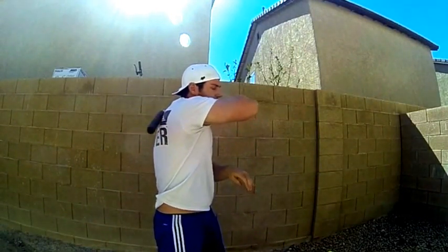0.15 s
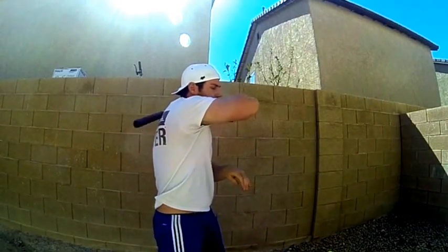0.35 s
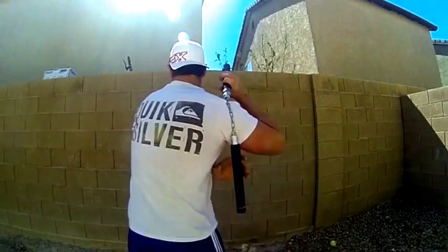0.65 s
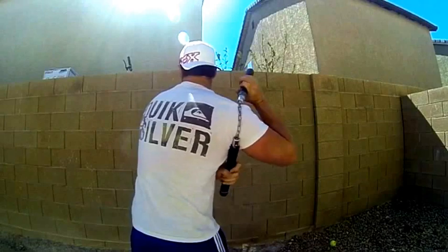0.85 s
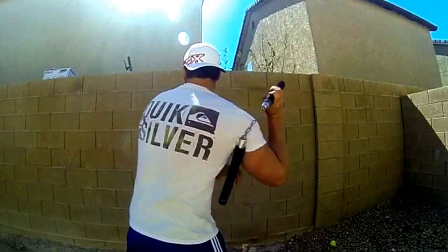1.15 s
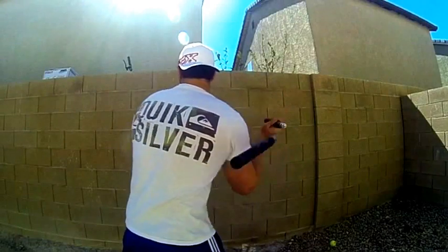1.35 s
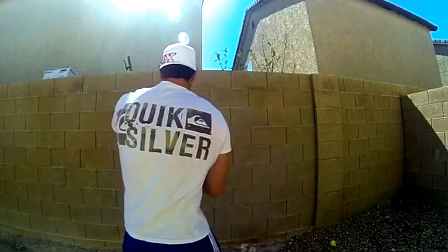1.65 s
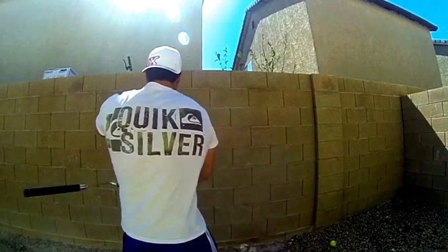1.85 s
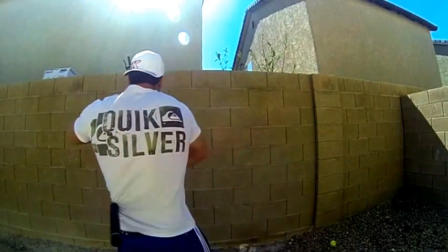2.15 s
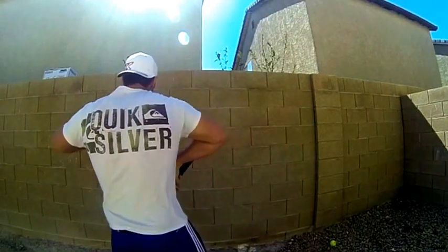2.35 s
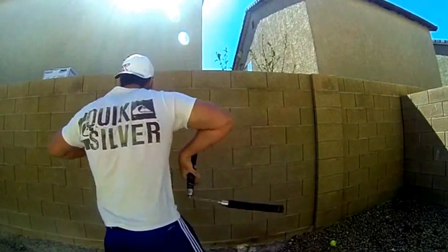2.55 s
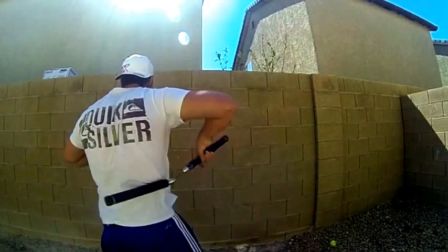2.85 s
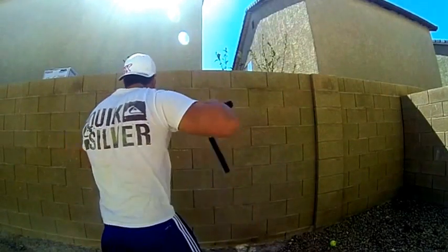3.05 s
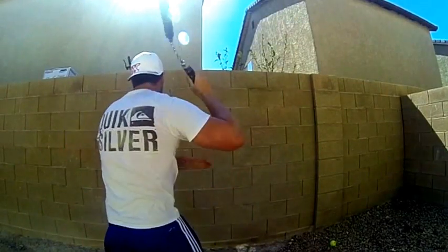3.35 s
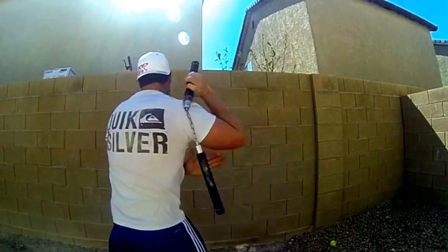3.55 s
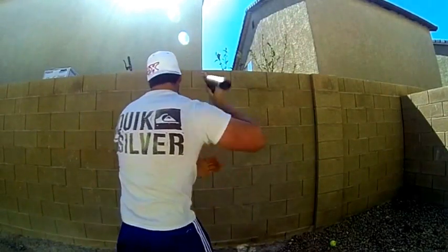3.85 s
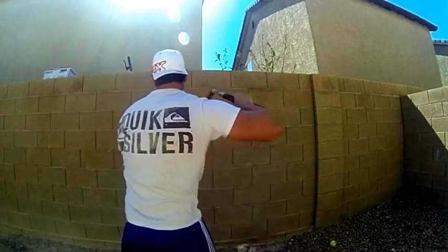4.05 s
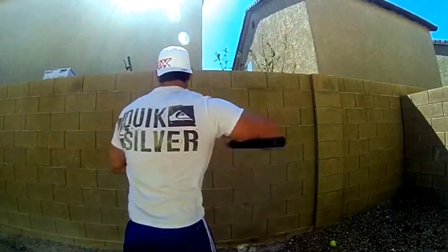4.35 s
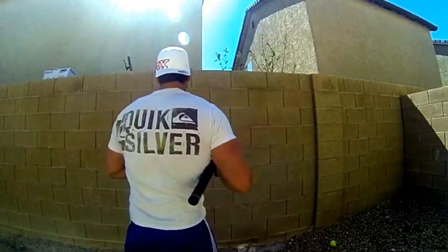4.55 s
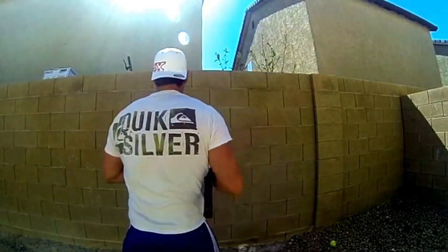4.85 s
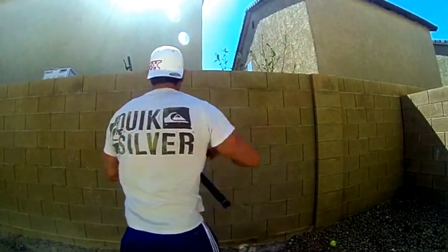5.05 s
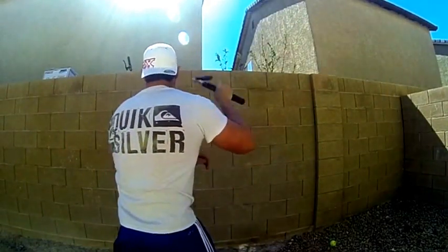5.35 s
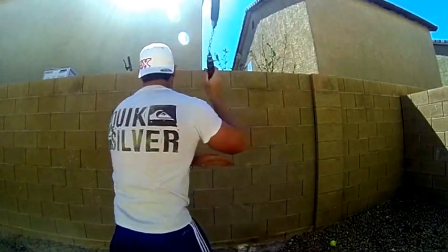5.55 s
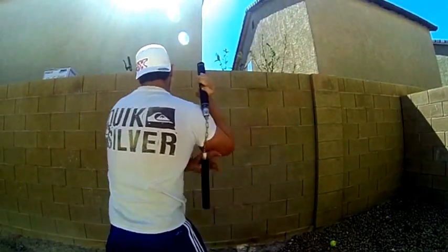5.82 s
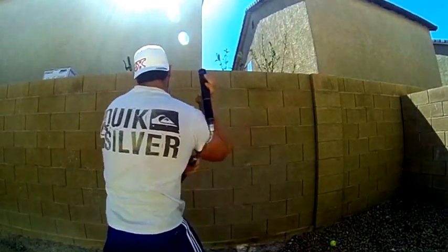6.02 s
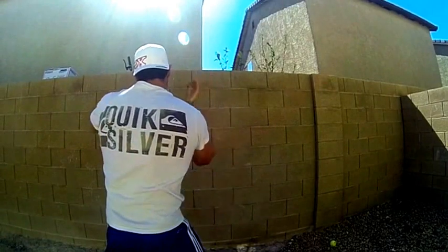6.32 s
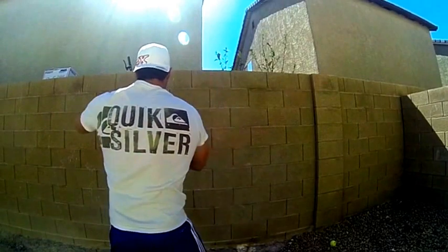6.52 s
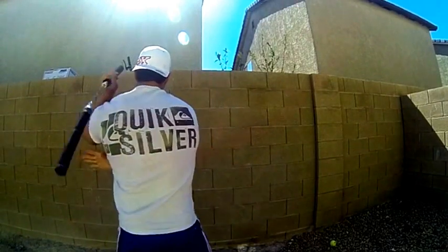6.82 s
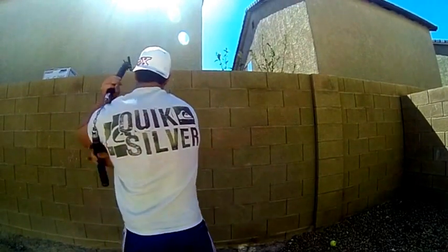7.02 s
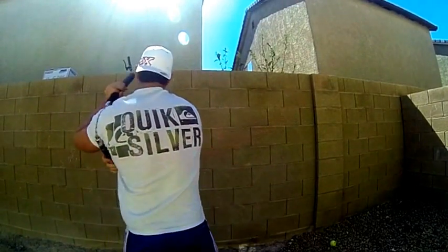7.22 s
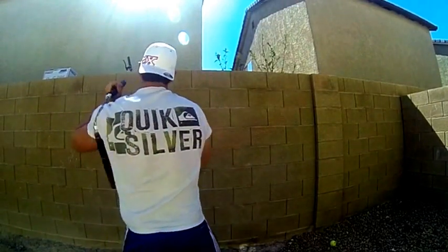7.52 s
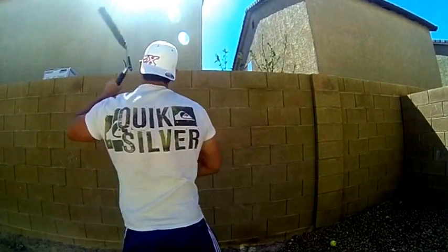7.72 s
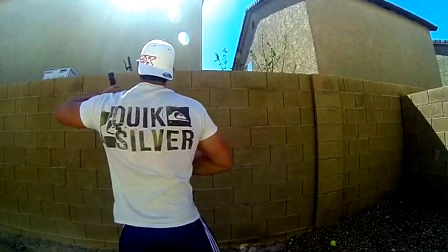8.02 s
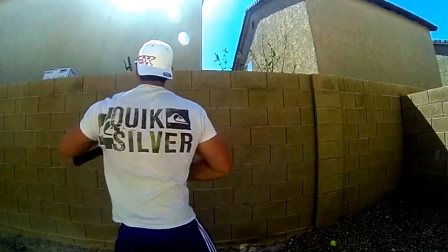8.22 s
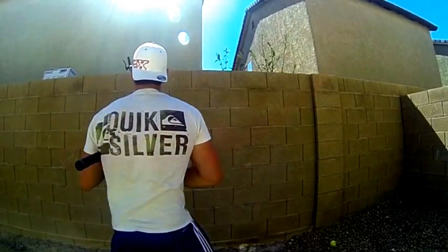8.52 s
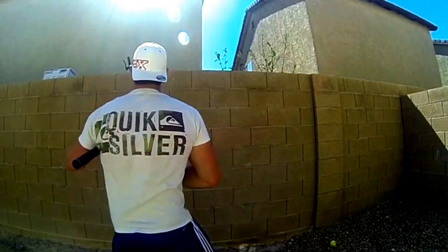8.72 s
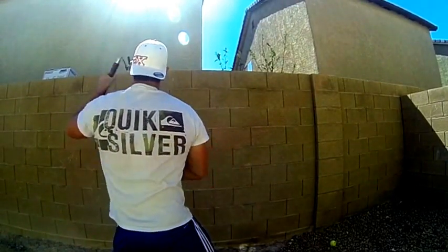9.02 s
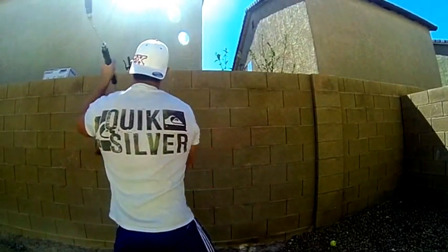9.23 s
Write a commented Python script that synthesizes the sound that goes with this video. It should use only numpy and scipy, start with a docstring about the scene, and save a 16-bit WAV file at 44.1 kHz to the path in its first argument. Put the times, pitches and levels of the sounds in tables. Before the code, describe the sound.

From 0 to 0.7 s the sound is slowed five times: dull, stretched low wind with lowered electronic hiss, whine and ticks. It fades out and normal speed fades in. Deep wind buffeting and mount rumble continue throughout, over thin hiss, a faint high pulsing whine and buzz. Stick knocks come at 0.8, 1.15 and 1.4 s, then a strong hollow blow at 1.86. Small chain clinks and clacks gather around 2.65-2.8. Contacts at 3.2-3.8 mix with soft case whistles; the loudest thud lands at 4.0. From 4.35 to 5.3 there is a busy run of light clacks and scuffs, with wind thumps and whistling gusts. Sparser taps follow at 5.84, 6.25 and 6.6, a scrape and chain rattle at 6.9, airy puffs near 7.9, firm knocks at 8.35 and 8.67, and a light one at 9.2. Short wall slaps and dull yard echoes follow the blows.

```python
"""A slowed opening, five times slower, holds wind over a plastic-cased camera and its hiss, whine, buzz and tick.
It fades out and real time fades in: eddies push the microphone membrane, shake the mount and feed the case modes.
Chain-linked sticks then strike and scrape, ringing the modes; a near wall and a walled yard answer.
Loose links touch and the slack chain rattles between blows; later, short gusts make the case whistle."""
import sys
import numpy as np
from scipy import signal
from scipy.fft import rfft, irfft
from scipy.io import wavfile
from scipy.ndimage import uniform_filter1d

SR = 44100
rng = np.random.default_rng(int(sys.argv[2]) if len(sys.argv) > 2 else 0)


def wav_out(sig):
    """Save sig, one row per channel (or a flat mono array), as 16-bit PCM at SR to the path in sys.argv[1]."""
    wavfile.write(sys.argv[1], SR, np.round(np.clip(np.atleast_2d(sig).T, -1, 1) * 32767).astype(np.int16))


N = 413658


def undb(db):
    """Amplitude factor of a level in dB."""
    return 10 ** (np.asarray(db) / 20)


def level(x, db):
    """Scale x to an rms level in dB."""
    return x * undb(db) / np.sqrt(np.mean(x ** 2))


def band(lo_hz, hi_hz, order=2):
    """Band-limited noise, rms 1, past the filter's onset."""
    sos = signal.butter(order, [lo_hz, hi_hz], "bandpass", fs=SR, output="sos")
    return level(signal.sosfilt(sos, rng.standard_normal(N + SR))[SR:], 0)


def ring(x, modes):
    """Sum of decaying two-pole resonances driven by x."""
    out = np.zeros(x.shape)
    for hz, db, t60_s in modes:
        r = np.exp(-np.log(1000) / (t60_s * SR))
        w = 2 * np.pi * hz / SR
        out += undb(db) * signal.lfilter([np.sin(w)], [1, -2 * r * np.cos(w), r * r], x)
    return out


def walk(rate_hz):
    """Random values drawn at rate_hz and smoothed; spread somewhat below 1."""
    k = int(SR / rate_hz)
    held = np.repeat(rng.standard_normal(N // k + 1), k)
    return uniform_filter1d(uniform_filter1d(held, k), k)[:N]


def swells(rows):
    """Sum of raised-cosine gain bumps, one per (middle [s], width at half gain [s], level [dB])."""
    t = np.arange(N) / SR
    gain = 0
    for middle_s, width_s, db in rows:
        phase = np.pi * np.clip((t - middle_s) / (2 * width_s), -.5, .5)
        gain = gain + undb(db) * np.cos(phase) ** 2
    return gain


# wind: (time [s], slow buffeting [dB], quick buffeting [dB], mount shake [dB], case hum [dB])
WIND_LEVELS = [(0.8, -36, -49.5, -66, -59.5), (1.11, -36.5, -53, -45.5, -65.5),
               (1.54, -32, -27, -57, -59.5), (1.71, -23, -51, -42, -55), (1.85, -29, -35.5, -47, -57),
               (2.9, -30.5, -42, -51, -55.5), (3.15, -32.5, -40, -48, -58.5),
               (3.57, -30.5, -31.5, -49, -55.5), (3.98, -32, -45.5, -48.5, -62),
               (4.03, -30, -36.5, -47.5, -61), (4.17, -20.5, -37, -52.5, -55.5),
               (4.55, -31.5, -48, -51, -54), (4.75, -37.5, -24, -41.5, -65), (4.93, -33, -20, -45, -49),
               (5.08, -35.5, -32.5, -47.5, -53.5), (5.2, -31.5, -50, -46.5, -58),
               (5.91, -31, -46, -55.5, -64.5), (5.99, -23, -44, -37.5, -54),
               (6.17, -33.5, -36.5, -51.5, -56), (6.61, -31, -49, -47.5, -57.5),
               (7.23, -32.5, -32.5, -49, -62.5), (7.8, -41, -58, -59.5, -65),
               (8.23, -30, -38.5, -52.5, -61), (8.92, -30, -48.5, -49, -65.5),
               (9.38, -36, -41.5, -56, -66.5)]
# wind in the slowed opening: (slow buffeting [dB], quick buffeting [dB], mount shake [dB], case hum [dB])
OPENING_WIND = (-34.5, -37, -57, -73)


def wind_gains():
    """Wind strength over time as four interpolated gains, one per mechanism."""
    t = np.arange(N) / SR
    s, *columns = np.transpose([(0.42, *OPENING_WIND)] + list(WIND_LEVELS))
    return [undb(np.interp(t, s, column)) for column in columns]


def buffeting(slow, quick):
    """Eddies push the microphone membrane: two bands of very low noise."""
    return slow * band(8.64, 21.1, order=3) + quick * band(22.85, 34.9, order=4)


# shaking mount: (frequency [Hz], width [Hz], relative level [dB])
MOUNT_BANDS = [(53.86, 13, 0), (68, 21, -5.5)]


def mount_shake(shake):
    """Wind shakes the mount unsteadily: narrow noise bands, flickering together."""
    unsteady = shake * undb(3.5 * walk(5))
    return unsteady * sum(undb(db) * band(hz - w / 2, hz + w / 2) for hz, w, db in MOUNT_BANDS)


# case modes, also rung by rush, contacts and rattle: (frequency [Hz], gain [dB], t60 [s])
CASE_MODES = [(126.9, -18.5, 0.34), (149.4, -15, 0.34), (250, -11, 0.14), (334, -16, 0.2), (372, -19, 0.34),
              (697.2, 3, 0.071), (778, -2, 0.075), (809.7, -9.5, 0.17), (940, -8, 0.05), (1016, -13, 0.26),
              (1055, -3.5, 0.07), (1140, -5, 0.035), (1520, 2, 0.03), (1673, 7.5, 0.031), (1810, -5, 0.048),
              (2000, -7, 0.03), (2280, 3, 0.015), (2580, 5, 0.018), (2900, 4, 0.042), (3400, -4, 0.014),
              (3800, -1, 0.02), (4200, -8, 0.012), (4600, -12, 0.01)]
# swells of the low modes: (middle [s], width [s], level at 250 Hz before trim [dB], tilt [dB/octave])
HUM_BUMPS = [(1.9, 0.089, -51, 5), (3.043, 0.079, -56, 8.5), (3.275, .05, -48.5, -0.5),
             (4.591, 0.036, -49, -5), (4.725, 0.088, -49, -1), (4.949, 0.087, -44, -3),
             (5.152, 0.057, -44.5, -3), (5.05, 0.1, -54, -6), (6.046, 0.035, -54, -11),
             (6.286, 0.095, -50.5, -0.5), (6.94, 0.17, -55.5, 9), (7.655, 0.067, -52, 0.5),
             (8.009, 0.052, -49.5, -6)]


def case_hum(hum):
    """Each low case mode is fed by its own eddies, over a broad rumble."""
    flicker_db = 3
    low_modes = CASE_MODES[:5]
    eddies = [ring(rng.standard_normal(N) * undb(flicker_db * walk(6)), [m]) for m in low_modes]
    tones = 0
    for (hz, _, _), eddy in zip(low_modes, eddies):
        bumps = swells([(s, w, db + tilt * np.log2(hz / 250)) for s, w, db, tilt in HUM_BUMPS])
        tones = tones + (hum + bumps) * eddy
    tones = tones * undb(-4.5) / np.std(sum(eddies))
    rumble = hum * undb(-7.0 + flicker_db * walk(10)) * band(77, 390, order=3)
    return tones + rumble


# puffs over the case, first three heard slowed: (middle [s], width [s], level [dB])
AIR_PUFFS = [(0.115, .02, -65), (0.155, .03, -66), (0.215, .015, -68), (1.11, 0.12, -69.5),
             (1.71, 0.34, -71.5), (2.5, 0.2, -76.5), (3.21, 0.036, -72), (3.45, 1, -67.5),
             (4.11, 0.08, -60.5), (4.91, 0.11, -73), (5.24, 0.088, -65), (6.545, 0.02, -61),
             (6.94, 0.12, -58.5), (8.74, .07, -62.5), (4.7, 0.16, -76), (5.0, 0.16, -75.5),
             (3.3, 0.086, -61), (3.42, 0.036, -69), (7.65, 0.05, -61), (7.81, 0.09, -62),
             (7.905, .02, -54.5), (7.95, 0.07, -64)]


def air_rush():
    """Steady air and puffs rush over the case and ring its next seven modes with noise."""
    gain = undb(-69.5 + 0.5 * walk(11)) + swells(AIR_PUFFS)
    air = band(620, 877, order=1) * undb(3.4 * walk(16))
    return gain * level(ring(air, CASE_MODES[5:12]), -0.038)


# hiss spectrum shape: (frequency [Hz], relative density [dB])
HISS_SHAPE = [(80, -6), (190, -19), (300, -24.5), (510, -28), (900, -30), (1150, -32.5), (1470, -27),
              (1900, -35.5), (3000, -40.5), (4400, -44.5), (5600, -40), (6200, -47), (6700, -59.5),
              (7200, -50.5)]


def hiss():
    """Electronic noise coloured in the spectrum."""
    f = np.fft.rfftfreq(N, 1 / SR) + 1  # +1 keeps the log finite
    hz, db = np.transpose(HISS_SHAPE)
    colour = undb(np.interp(np.log(f), np.log(hz), db)) * (f > 50)
    return level(irfft(rfft(rng.standard_normal(N)) * colour, N), -56.5)


FRAME_HZ = 120


def whine():
    """A tone and noise gated on for part of every frame, each burst at its own phase and pitch."""
    t = np.arange(N) / SR
    frame = t * FRAME_HZ
    is_on = (frame % 1 > .39) & (frame % 1 < .95)
    gate = is_on * undb(-1.8 * (frame % 2 > 1))  # alternate frames are weaker
    gate = uniform_filter1d(gate, 40)
    phase, detune = rng.standard_normal((int(frame[-1]) + 1, 2))[frame.astype(int)].T
    tone = np.sin(2 * np.pi * ((5670 + 70 * detune) * t + phase))
    return gate * (undb(-69.5) * tone + undb(-83.5) * band(5000, 5240, order=1))


# buzz harmonics: (multiple of the frame rate)
BUZZ_HARMONICS = (11, 12, 21, 22, 23, 26, 27, 28, 39)
# buzz harmonics, same order: (level [dB rms])
BUZZ_LEVELS_DB = (-79.5, -78.5, -90, -95.5, -91, -99, -96.5, -100.5, -99)


def buzz():
    """Thin electronic buzz: steady harmonics of the frame rate."""
    frame = np.arange(N) / SR * FRAME_HZ
    harmonics = zip(BUZZ_HARMONICS, BUZZ_LEVELS_DB)
    return sum(np.sqrt(2) * undb(db) * np.sin(2 * np.pi * k * frame + k * k) for k, db in harmonics)


def tick():
    """Faint regular electronic tick: a high tone under short Gaussian envelopes."""
    rate_hz, width_s = 8.004, .003
    t = np.arange(N) / SR
    offset_s = ((t * rate_hz + .5) % 1 - .5) / rate_hz
    return undb(-74) * np.exp(-(offset_s / width_s) ** 2) * np.sin(2 * np.pi * 6150 * t)


# contacts on palms, body and links:
# (time [s], level [dB], knock share [dB], clack share [dB], click above clack [dB], drag [ms])
CONTACTS = [(0.772, -43.5, -20, -18.5, -9, 4.9), (0.8, -39, -11, -21.5, -12, 3.7),
            (1.149, -40.5, -6, -27, -8, 5.44), (1.4, -47.5, -6, -15, -3.5, 4.9),
            (1.857, -24, -5.5, -19.5, -10, 4.1), (1.925, -33, -15, -38, -6, 4.2),
            (2.655, -45, -8, -22, -1, 9.6), (2.726, -60, -15, -7.5, 3, 1.5), (2.734, -63, -23, -9.5, 7, 2),
            (2.757, -58, -17, -6, 0, 3), (2.774, -38, -17, -11.5, -9.5, 3.1),
            (3.23, -39, -8, -27, -15, 2.6), (3.386, -42.5, -21, -22, -15, 10.1),
            (3.5975, -47.5, -11, -7, -5, 2.9), (3.603, -38.5, -15, -10.5, -17, 7.1),
            (3.629, -43.5, -11, -19, -7, 4.8), (3.724, -46, -22, -23, -8, 3.7),
            (3.779, -50, -21, -9, -17, 4.2), (3.998, -19, -7.5, -26, -7.5, 4.63),
            (4.355, -39, -14.5, -6.5, -14.5, 3.9), (4.442, -48.5, -13, -11.5, -17, 5.6),
            (4.47, -49, -12.5, -15, -11, 4.8), (4.626, -51.5, -6.5, -9, -14, 2.8),
            (4.692, -45, -9, -7.5, -29, 2.5), (4.743, -51.5, -12, -9, -18.5, 4),
            (4.782, -58, -3, -7.5, -18, 4.1), (4.834, -45.5, -9, -25, -1.5, 5.3),
            (4.855, -41.5, -17, -20, -13, 6.14), (4.914, -43, -13, -20.5, -15, 6.4),
            (4.929, -48, -0.5, -23, -14, 4.5), (4.975, -51, -14, -29, -7, 5.7),
            (5.059, -47, -10.5, -19, -14, 4.1), (5.119, -49, 1, -21, -3, 4.3),
            (5.271, -47, -18, -26, 0, 4.4), (5.841, -46.5, -19, -14, -8.5, 3.5),
            (6.242, -52, -1.5, -17, -10, 16), (6.278, -43, -6, -28, -1, 9.7),
            (6.618, -37.5, -32, -32, 0, 0.9), (6.901, -43, -18, -25, -10, 16),
            (6.942, -43, -14, -11, -6, 2.34), (7.283, -52, 1.5, -17, -14, 6.4),
            (7.481, -65.5, -9, -7, 6, 3.8), (8.219, -46, -13, -6, -14.5, 3.2),
            (8.245, -57, -12, -7, -12, 3.8), (8.2815, -45, -11, -12, -19, 6.3),
            (8.35, -31.5, -6, -28, -13, 4.5), (8.67, -32.5, -8, -27, -19, 4.6),
            (9.198, -49, -5.5, -26, -13, 5.2)]
# thud, knock, clack, click bands: (low [Hz], high [Hz])
CONTACT_BANDS_HZ = [(640, 900), (880, 1250), (1400, 2150), (2150, 4600)]
# dry part beside the ringing modes: (thud, knock, clack, click [relative gain])
DRY_PARTS = (.2, .3, 1.6, 2.6)
# how late each band speaks: (thud, knock, clack, click [ms])
BAND_LAGS_MS = (1.3, 0.3, 2.2, 2.4)


def contacts():
    """Blow plus scrape per contact: soft ones drive lower modes, hard ones higher; returns sound and blows."""
    s, contact_db, knock_db, clack_db, click_db, drag_ms = np.transpose(CONTACTS)
    base_thud_db, hard_from_db, thud_loss = -6, -17.5, 0.57
    thud_db = base_thud_db - thud_loss * np.maximum(clack_db - hard_from_db, 0)
    share_db = thud_db, knock_db, clack_db, clack_db + click_db

    t = np.arange(int(.15 * SR)) / SR
    sharp = np.exp(-(drag_ms / 4.45) ** 4)[:, None]  # 1 for a tap, 0 for a scuff
    age = t / (drag_ms[:, None] * .001)
    swell_in = sharp + (1 - sharp) * 2 * age ** 2
    push = rng.standard_normal((len(s), len(t))) * swell_in * np.exp(-age * (2 - sharp))
    # first sample is the blow; hard contacts are mostly scrape
    push[:, 0] = 8.9 * sharp[:, 0] * undb(thud_db - base_thud_db)

    # each contact strikes the modes a little differently
    spot_db = 2.5 * rng.standard_normal((len(s), len(CASE_MODES)))
    # the long ring wakes most under heavy blows
    spot_db[:, 9] += np.clip(.5 * (contact_db - contact_db.max()), -12, 0)
    # wood rings this mode, links barely do
    spot_db[:, 18] -= np.clip(2 * (clack_db + 18), 0, 14)

    sound = 0
    fills_db = (-5, -10, -4, -4)
    bands = zip(CONTACT_BANDS_HZ, share_db, DRY_PARTS, fills_db, BAND_LAGS_MS)
    for (lo, hi), db, dry_part, fill_db, lag_ms in bands:
        order = 5 if hi > 4000 else 3
        sos = signal.butter(order, [lo, hi], "bandpass", fs=SR, output="sos")
        drive = signal.sosfilt(sos, push)
        part = 10 * dry_part * drive
        for k, mode in enumerate(CASE_MODES):
            if lo < mode[0] <= hi:
                part = part + undb(spot_db[:, [k]]) * ring(drive, [mode])
        early_rms = np.sqrt(np.mean(part[:, :SR // 40] ** 2, axis=1))
        part = np.pad(part, ((0, 0), (int(lag_ms * SR / 1000), 0)))[:, :len(t)]
        sound = sound + part * (undb(contact_db + db + fill_db) / early_rms)[:, None]

    # contacts start before they are heard to rise, scuffs earlier than taps
    lead_s = 0.0028 + .3 * (1 - sharp[:, 0]) * drag_ms * .001
    starts = ((s - lead_s) * SR).astype(int)
    direct, blows = np.zeros(N + len(t)), np.zeros(N)
    for start, row, db in zip(starts, sound, contact_db + thud_db):
        direct[start:start + len(t)] += row
        blows[start] = undb(db)
    return direct, blows


# late low modes: (frequency [Hz], gain [dB], t60 [s], delay [s])
BOOM_MODES = [(249.6, -14.5, .07, .014), (335.4, -17, 0.1, .025)]


def boom(blows):
    """The lowest modes build up late: each blow passes through a resonance twice."""
    out = 0
    for hz, db, t60_s, late_s in BOOM_MODES:
        once = ring(np.roll(blows, int(late_s * SR)), [(hz, db, t60_s)])
        out = out + ring(once, [(hz, 0, t60_s)]) * 37 / (t60_s * SR)
    return undb(2.5) * out


def walls(direct):
    """The nearest wall slaps back once; the yard answers with dull decaying noise."""
    wall_s, yard_t60_s, yard_gap_s = .024, 0.22, 0.0079
    t = np.arange(int(.5 * SR)) / SR
    yard = rng.standard_normal(len(t)) * undb(-60 * t / yard_t60_s) * (t > yard_gap_s)
    yard = yard / np.sqrt(np.sum(yard ** 2))
    yard = signal.sosfilt(signal.butter(2, 1500, fs=SR, output="sos"), yard)
    slap = undb(-12) * np.roll(direct[:N], int(wall_s * SR))
    return slap + undb(-15) * signal.fftconvolve(direct, yard)[:N]


def sticks():
    """Direct contacts, their late low modes and the answer of the walls."""
    direct, blows = contacts()
    return direct[:N] + boom(blows) + walls(direct)


# loose links touching: (time [s], strike level [dB])
LINK_TOUCHES = [(1.2545, -52), (2.6465, -58), (2.659, -61), (2.666, -61), (2.687, -54), (2.699, -61),
                (2.7255, -57), (2.775, -58)]
# link mode: (frequency [Hz], gain [dB], t60 [s])
LINK_MODES = [(4330, -9.5, 0.03)]


def tinks():
    """Loose links touch: single impulses ring a high mode."""
    touches = np.zeros(N)
    for s, db in LINK_TOUCHES:
        touches[int(s * SR)] = undb(db)
    return ring(touches, LINK_MODES)


# slack chain rattles: (middle [s], width [s], level [dB])
CHAIN_RATTLES = [(1.42, 0.034, -72), (2.69, .06, -69.5), (2.8, 0.022, -70), (3.63, 0.071, -71),
                 (4.39, 0.052, -68), (4.46, 0.046, -76), (4.7, .1, -78), (6.92, 0.025, -66),
                 (6.98, 0.09, -65.5), (8.25, .04, -75), (8.3, 0.037, -65)]


def rattle():
    """Dense small link clicks of uneven size ring the middle case modes."""
    clicks_per_s = 700
    clicks = (rng.random(N) < clicks_per_s / SR) * rng.standard_normal(N)
    return swells(CHAIN_RATTLES) * level(ring(clicks, CASE_MODES[12:18]), 0)


# gusts that make the case whistle: (middle [s], width [s], level [dB])
WHISTLE_GUSTS = [(3.21, 0.071, -52), (3.295, 0.055, -48.5), (3.35, 0.031, -53), (3.395, 0.045, -54),
                 (3.687, 0.04, -50.5), (3.732, 0.025, -54.5), (3.77, 0.035, -57), (3.86, 0.1, -57.5),
                 (4.55, 0.052, -55.5), (4.63, 0.066, -62.5), (4.71, 0.045, -60), (4.8, 0.037, -56.5),
                 (4.875, 0.053, -53), (4.925, 0.03, -51), (4.984, 0.034, -46.5), (5.066, 0.032, -46),
                 (5.103, .03, -45.5), (5.145, 0.036, -55), (7.79, 0.059, -60), (7.955, 0.06, -61)]


def whistle():
    """Short gusts make the case whistle: a wavering tone with narrow noise around it."""
    cycles = np.cumsum(677 + 11.1 * walk(40)) / SR
    tone = undb(2.5 * walk(40)) * np.sin(2 * np.pi * cycles)
    return swells(WHISTLE_GUSTS) * (tone + undb(-7) * band(655, 712))


def scene():
    """Sum of wind, electronics, sticks and chain, as one channel."""
    slow, quick, shake, hum = wind_gains()
    wind = buffeting(slow, quick) + mount_shake(shake) + case_hum(hum) + air_rush() + whistle()
    electronics = hiss() + whine() + buzz() + tick()
    chain = tinks() + rattle()
    return (wind + electronics + sticks() + chain)[None]


def record(dry):
    """The camera cuts the top; the edit slows the opening, fades it out, then fades real time in."""
    slow_factor, cut_s, top_hz = 5, .716, 7300
    top = signal.ellip(10, .2, 60, top_hz, fs=SR, output="sos")
    live = signal.sosfilt(top, dry)
    t = np.arange(N) / SR
    opening = live[:, SR // 10:SR // 10 + SR // 4]
    slowed = signal.resample_poly(opening, slow_factor, 1, axis=1, window=("kaiser", 12))
    slowed = np.pad(slowed, ((0, 0), (0, N - slowed.shape[1])))
    fade_out = np.clip((cut_s - t) / 0.11, 0, 1)
    fade_in = np.clip((t - cut_s) / 0.1, 0, 1)
    return signal.sosfilt(top, undb(0.5) * fade_out * slowed + fade_in * live)


dry = scene()
out = record(dry)
wav_out(out)
```